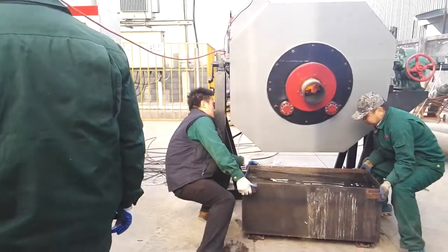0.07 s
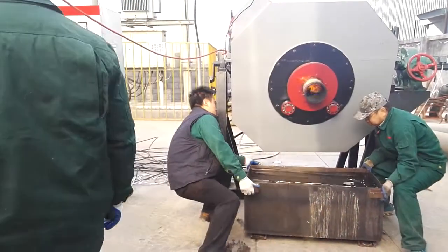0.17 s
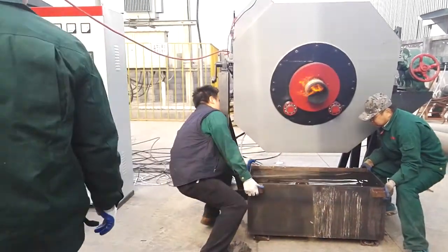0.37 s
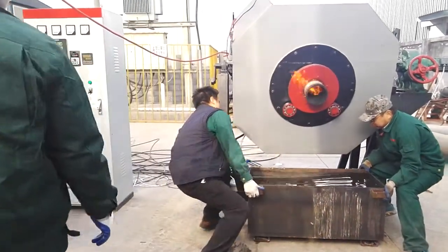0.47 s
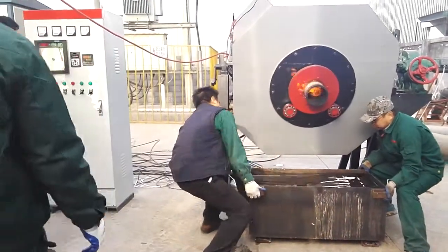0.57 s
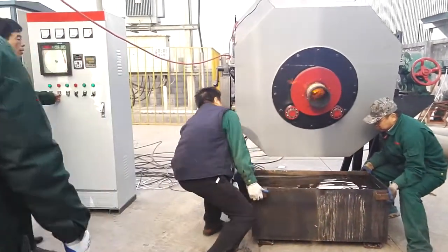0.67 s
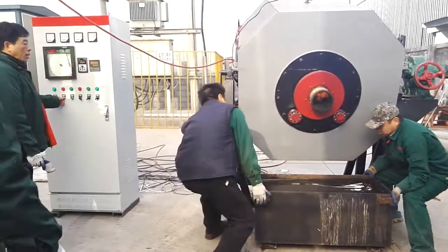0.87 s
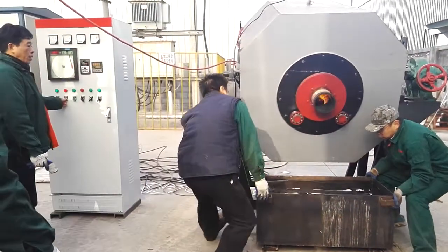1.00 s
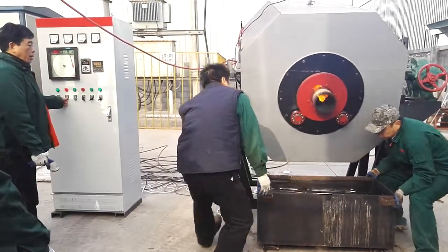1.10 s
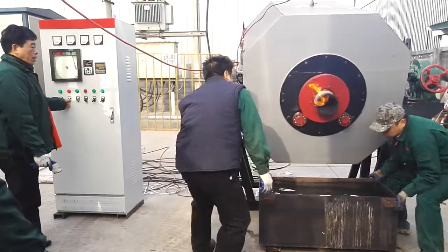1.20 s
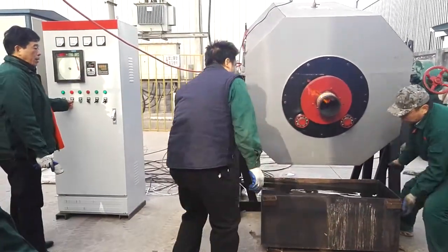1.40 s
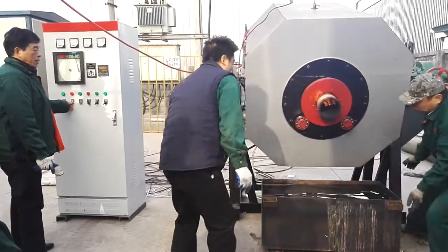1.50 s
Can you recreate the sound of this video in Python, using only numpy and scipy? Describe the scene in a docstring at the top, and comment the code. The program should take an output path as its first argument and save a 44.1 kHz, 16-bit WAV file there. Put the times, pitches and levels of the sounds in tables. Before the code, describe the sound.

Hot metal sizzles in a quench tank, bursting into one strong hissing surge of steam

```python
"""A factory yard: hot metal sizzles in a quench tank, heard through two microphone ports open to the wind.
The sizzle is tiny bubble pops on steam noise, swelling and sinking, with one strong surge and a short spit after it.
A furnace burner drones behind as noise through a ringing drum, with a throbbing hum; low rumble and soft
pushes are the wind. The steel tank grinds as it is dragged, takes two knocks, and some of its walls sing.
The right port hears all but the deep bass first; each port rings at its own treble pitch."""
import sys
import numpy as np
from scipy import signal
from scipy.fft import rfft, irfft, next_fast_len
from scipy.io import wavfile
from scipy.ndimage import uniform_filter1d, map_coordinates

SR = 44100
rng = np.random.default_rng(int(sys.argv[2]) if len(sys.argv) > 2 else 0)


def wav_out(sig):
    """Save sig, one row per channel (or a flat mono array), as 16-bit PCM at SR to the path in sys.argv[1]."""
    wavfile.write(sys.argv[1], SR, np.round(np.clip(np.atleast_2d(sig).T, -1, 1) * 32767).astype(np.int16))


N = 66150
T = np.arange(N) / SR  # s


def amp(db):
    """Gain of a level in dB."""
    return 10 ** (np.asarray(db) / 20)


def unit(x):
    """Scaled to rms 1, over both channels together."""
    return x / np.sqrt(np.mean(x ** 2) + 1e-20)


def along(points, hz):
    """Value at each frequency, from (Hz, value) points joined on a log axis."""
    f, v = np.transpose(points)
    return np.interp(np.log(hz + 1), np.log(f + 1), v)


def curve(rows):
    """One value per sample, from (s, value) rows joined by straight lines."""
    return np.interp(T, *np.transpose(rows))


def wobble(rate):
    """A smooth random curve through `rate` random knots a second."""
    knots = rng.standard_normal(int(N * rate / SR) + 4)
    return map_coordinates(knots, [T * rate])


def filtered(x, response):
    """x through a filter given as a complex response of frequency."""
    m = next_fast_len(N + 8192)  # padded so that ringing does not wrap round
    return irfft(rfft(x, m) * response(np.fft.rfftfreq(m, 1 / SR)), m)[..., :N]


def bumps(hz, peaks):
    """Gain of resonances: a raised peak at each (Hz, width Hz, dB)."""
    return amp(sum(db / (1 + (2 * (hz - centre) / width) ** 2) for centre, width, db in peaks))


def spread(pair, spectrum, alike):
    """Two raw streams to coloured stereo of rms 1: left takes a share of right's stream."""
    def shares(hz):
        share = np.clip(along(alike, hz), 0, 1)
        return np.array([share, np.sqrt(1 - share ** 2)])

    same, own = filtered(pair, shares)
    stereo = np.array([same + own, pair[0]])
    return unit(filtered(stereo, lambda hz: amp(along(spectrum, hz))))


def patchy(patchy_db):
    """Two white noises under one field of random gain patches in time and frequency."""
    z = signal.stft(rng.standard_normal((2, N)), nperseg=512)[2]
    field = uniform_filter1d(rng.standard_normal(z.shape[1:]), size=6, axis=0)
    field = uniform_filter1d(field, size=8, axis=1)
    noise = signal.istft(z * amp(patchy_db * unit(field)), nperseg=512)[1]
    return unit(noise[:, :N])


# Wind over the ports, as the right one takes it. Each row: time in seconds, level in dB before the lumps.
WIND_LEVEL = [(0, -48), (.2, -46.5), (.4, -50.5), (.8, -48), (.87, -52.5), (1.2, -51), (1.33, -48.5),
              (1.5, -53)]
# Colour of the wind rumble. Each row: frequency in Hz, level in dB per Hz.
RUMBLE_COLOUR = [(20, -14), (60, -0.5), (130, -8), (400, -15), (900, -54)]
# Soft pushes on the ports. Each row: centre in seconds, peak in dB at the right port, pitch in Hz.
WIND_PUSHES = [(.198, -36, 55), (.29, -40, 70), (.738, -31, 80), (.7905, -25.5, 90), (1.02, -38, 81)]
WIND_LEFT_DB, PUSH_LEFT_DB = -5.5, -12  # left port against right
WIND_LUMPS_DB = 3
PUSH_CYCLES = .45  # half length of a push, in cycles of its pitch


def wind():
    """Lumpy low rumble, stronger on the right port, with soft pushes: short bell-shaped bursts of a low tone."""
    pushes = 0
    for centre, db, hz in WIND_PUSHES:
        cycles = (T - centre) * hz
        pushes = pushes + amp(db) * np.exp(-(cycles / PUSH_CYCLES) ** 2) * np.cos(2 * np.pi * cycles)
    lumps = WIND_LUMPS_DB * np.array([wobble(13.8), wobble(14.8)])
    rumble = spread(patchy(patchy_db=0.5), RUMBLE_COLOUR, [(50, 0.74)])
    rumble = amp(curve(WIND_LEVEL) + lumps) * rumble
    return rumble * amp([[WIND_LEFT_DB], [0]]) + pushes * amp([[PUSH_LEFT_DB], [0]])


# Colour of the burner noise before the drum. Each row: frequency in Hz, level in dB per Hz.
FLAME_COLOUR = [(40, -11), (100, -4), (170, -4.5), (300, -9), (600, -7), (1200, -7), (2500, -13),
                (5000, -26.5), (9000, -20)]
# Resonances of the furnace drum. Each row: frequency in Hz, width in Hz, height in dB.
FURNACE_DRUM = [(166, 94, 4.5), (245, 79, 9.5)]
# How alike the two ports hear the drone and the grinding. Each row: frequency in Hz, likeness from 0 to 1.
DRONE_LIKENESS = [(60, 0.79), (300, 0.94), (900, 0.24), (3000, 0.95), (9000, 0.051)]
# Low throbbing hum. Each row: time in seconds, level in dB.
HUM_LEVEL = [(0, -52), (.07, -48), (.3, -48.5), (.36, -55), (.43, -48), (.55, -60), (1.1, -60), (1.18, -50),
             (1.27, -51), (1.35, -58), (1.5, -54)]
BURNER_DB = -45.5
HUM_HZ, THROBS_PER_S, THROB_PEAK_S = 161, 14.2, .21


def burner():
    """Steady flame noise through the ringing furnace drum, with a low hum that swells regularly."""
    roar = spread(patchy(patchy_db=2.0), FLAME_COLOUR, DRONE_LIKENESS)
    roar = unit(filtered(roar, lambda hz: bumps(hz, FURNACE_DRUM)))
    swell = np.cos(np.pi * THROBS_PER_S * (T - THROB_PEAK_S)) ** 2
    hum = swell * np.sin(2 * np.pi * HUM_HZ * T + wobble(13))  # phase wanders, in radians
    return amp(BURNER_DB) * roar + amp(curve(HUM_LEVEL)) * unit(hum)


# The tank dragged on the floor. Each row: time in seconds, level in dB.
DRAG_LEVEL = [(.66, -42), (.72, -41), (.76, -57), (.87, -44.5), (.93, -38), (1.02, -38.5), (1.1, -37.5),
              (1.2, -37.5), (1.34, -35.5), (1.42, -37), (1.5, -37.5)]
# Colour of the grinding before the walls ring. Each row: frequency in Hz, level in dB per Hz.
GRIND_COLOUR = [(150, -35), (300, -3), (500, -5.5), (1000, -8), (1400, -10), (2500, -7), (4000, -8.5),
                (7000, -13), (10500, -17.5), (14000, -41)]
# Resonances of the tank walls. Each row: frequency in Hz, width in Hz, height in dB.
TANK_WALLS = [(310, 30, 2), (358, 24, 9), (430, 30, 5), (478, 30, 3), (620, 40, 5), (720, 30, 5),
              (868, 40, 4), (942, 35, 4)]
# Nudges to the tank. Each row: start in seconds, peak in dB.
TANK_KNOCKS = [(.711, -33), (.72, -28)]
# Walls that sing while the tank slides. Each row: frequency in Hz, relative level in dB.
SINGING_WALLS = [(358, -2), (868, 0), (942, -6)]
# Level of the whole song. Each row: time in seconds, level in dB.
SONG_LEVEL = [(1.05, -70), (1.09, -58), (1.115, -48), (1.2, -50), (1.25, -49), (1.35, -51), (1.4, -58),
              (1.45, -58), (1.49, -50)]
KNOCK_HZ, KNOCK_T60_S = 390, .045
SING_WANDER_HZ, SING_WAVER_DB = 9, 2.5


def tank():
    """The dragged steel tank: grinding noise rings in its walls, knocks are dying tones, some walls sing."""
    grind = spread(patchy(patchy_db=2.5), GRIND_COLOUR, DRONE_LIKENESS)
    grind = unit(filtered(grind, lambda hz: bumps(hz, TANK_WALLS)))
    knocks = 0
    for start, db in TANK_KNOCKS:
        since = np.clip(T - start, 0, None)
        knocks = knocks + amp(db - 60 * since / KNOCK_T60_S) * np.sin(2 * np.pi * KNOCK_HZ * since)
    song = 0
    for hz, db in SINGING_WALLS:
        loudness = amp(db + SING_WAVER_DB * wobble(25.07))
        pitch = hz + SING_WANDER_HZ * wobble(29.98)
        tone = np.sqrt(2) * np.sin(2 * np.pi * np.cumsum(pitch) / SR)  # rms 1
        song = song + loudness * tone
    return amp(curve(DRAG_LEVEL)) * grind + knocks + amp(curve(SONG_LEVEL)) * song


# How alike the two ports hear the hiss. Each row: frequency in Hz, likeness from 0 to 1.
HISS_LIKENESS = [(500, 0.9), (1300, 0.74), (2300, 0.77), (2900, 0.78), (3500, 1), (4300, 0.61),
                 (9000, 0.09), (14000, 0.12)]
POPS_PER_S, POP_SHARE = 3000, 0.25  # pops in each stream; their share of its power, before the flutter
PATCHY_DB, FLUTTER_DB = 1.9, .5


def bubbling(spectrum):
    """Dense tiny bubble pops, equally strong and of random sign, on patchy steam noise, fluttering fast."""
    hit = rng.random((2, N)) < POPS_PER_S / SR
    pops = unit(hit * rng.choice([-1, 1], size=(2, N)))
    raw = np.sqrt(POP_SHARE) * pops + np.sqrt(1 - POP_SHARE) * patchy(PATCHY_DB)
    flutter = amp(FLUTTER_DB * (wobble(26.24) + wobble(300)))
    return spread(raw * flutter, spectrum, HISS_LIKENESS)


# The fine sizzle in the tank. Each row: time in seconds, level in dB.
SIZZLE_LEVEL = [(0, -31), (.04, -31.5), (.11, -34), (.17, -32.5), (.25, -30.5), (.295, -33.5), (.34, -31),
                (.42, -29.5), (.5, -34), (.6, -36), (.9, -34.5), (.99, -45), (1.1, -37), (1.2, -41),
                (1.34, -39), (1.5, -43.5)]
# Colour of the sizzle. Each row: frequency in Hz, level in dB per Hz.
SIZZLE_COLOUR = [(600, -17), (1400, -9), (2400, -10), (3600, -18.5), (5200, -9), (6200, -5), (8500, -6),
                 (11000, -2.5), (14500, -4)]
# The strong surge of steam. Each row: time in seconds, jet level in dB before the dulling.
SURGE_LEVEL = [(.58, -66), (.61, -38), (.626, -29), (.668, -26.5), (.682, -22), (.71, -20), (.722, -16.5),
               (.765, -15), (.79, -17), (.83, -16.5), (.86, -20), (.885, -24.5), (.905, -36.5), (.93, -45),
               (.97, -73)]
# Spits of steam. Each row: start in seconds, jet level in dB before the dulling, left over right in dB.
STEAM_SPITS = [(1.036, -31.5, 6.5)]
# Colour of the jet at full blast, for surge and spit. Each row: frequency in Hz, level in dB per Hz.
STEAM_COLOUR = [(500, -20.5), (1300, -17), (2500, -7.5), (3600, -11.5), (5000, -7.5), (8000, -5.5),
                (10500, -3.5), (12500, 0), (14500, -2.5)]
SPIT_ATTACK_S, SPIT_HOLD_S, SPIT_T60_S = .007, .024, .13  # hold counts from the start of the spit
FULL_DB, DULL_HZ = -17.5, 6760  # jet level of full blast; a weaker jet is duller
DULL_GAIN = 0.44  # dB gained under DULL_HZ per dB below full blast


def quench():
    """Bubbling sizzle; the surge and the spit share one jet of steam that is duller when weaker."""
    sizzle = amp(curve(SIZZLE_LEVEL)) * bubbling(SIZZLE_COLOUR)
    blast = amp(curve(SURGE_LEVEL))
    for start, db, pan_db in STEAM_SPITS:
        sides_db = np.array([[pan_db], [-pan_db]]) / 2
        decay_db = 60 * np.clip(T - start - SPIT_HOLD_S, 0, None) / SPIT_T60_S
        attack = np.clip((T - start) / SPIT_ATTACK_S, 0, 1)
        blast = blast + amp(db + sides_db - decay_db) * attack
    jet = bubbling(STEAM_COLOUR)
    low = filtered(jet, lambda hz: 1 / (1 + (hz / DULL_HZ) ** 6))
    low_gain = (amp(FULL_DB) / blast) ** DULL_GAIN
    return sizzle + blast * (jet - low + low * low_gain)


# Phase advance of the left port, set against its lag. Each row: frequency in Hz, advance in radians.
LEFT_ADVANCE = [(60, 0.75), (300, 0.39), (800, 0.78), (1500, 0.15)]
LEFT_LAG_S = 19 / SR


def scene():
    """All sources together; the left port hears them a little later, but ahead in the deep bass."""
    def arrival(hz):
        left_phase = along(LEFT_ADVANCE, hz) - 2 * np.pi * hz * LEFT_LAG_S
        return np.array([np.exp(1j * left_phase), np.ones(len(hz))])

    return filtered(wind() + burner() + tank() + quench(), arrival)


# Treble ringing of the microphone ports, left then right. Each row: frequency in Hz, width in Hz, height in dB.
PORT_RINGING = [(12300, 1800, 3.5), (10570, 3380, 12)]
TOP_HZ = 14260  # band limit
CEILING, KNEE = .95, 4  # full-scale limit of the peaks; a higher knee bends later and harder


def record(dry):
    """Each port rings in the treble; the tallest peaks are rounded off; nothing passes above the band limit."""
    x = filtered(dry, lambda hz: np.array([bumps(hz, [port]) for port in PORT_RINGING]) * (hz < TOP_HZ))
    rounded = x / (1 + np.abs(x / CEILING) ** KNEE) ** (1 / KNEE)
    return filtered(rounded, lambda hz: hz < TOP_HZ)


dry = scene()
out = record(dry)
wav_out(out)
```